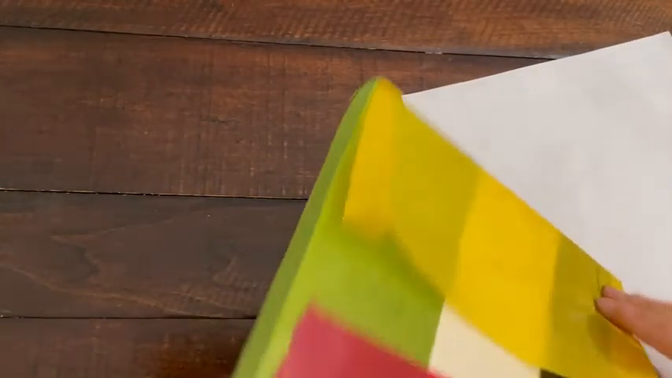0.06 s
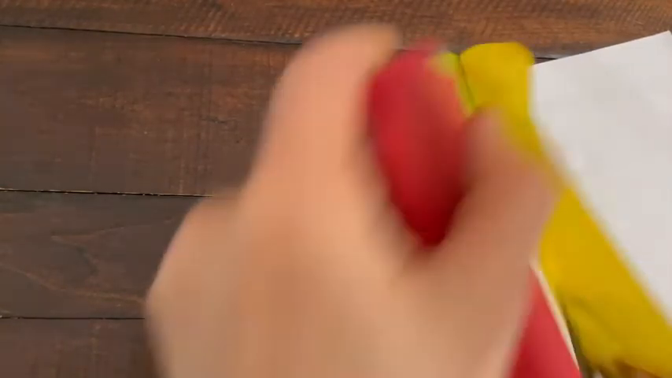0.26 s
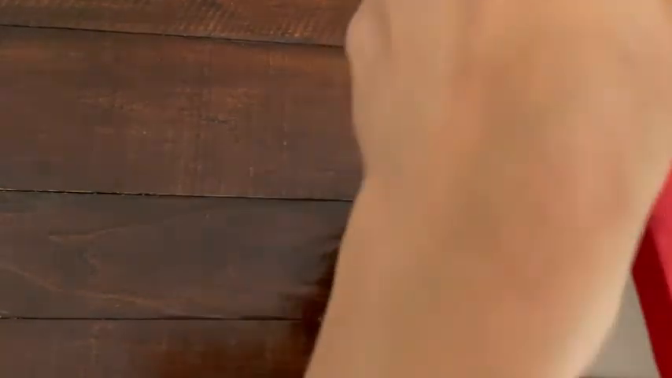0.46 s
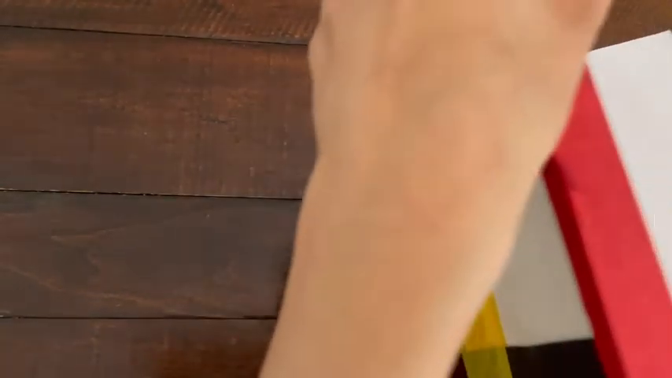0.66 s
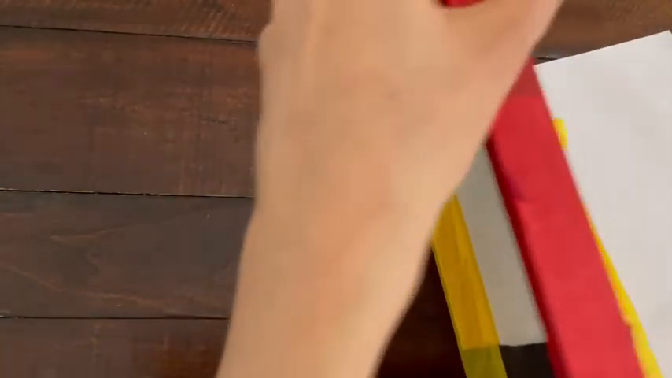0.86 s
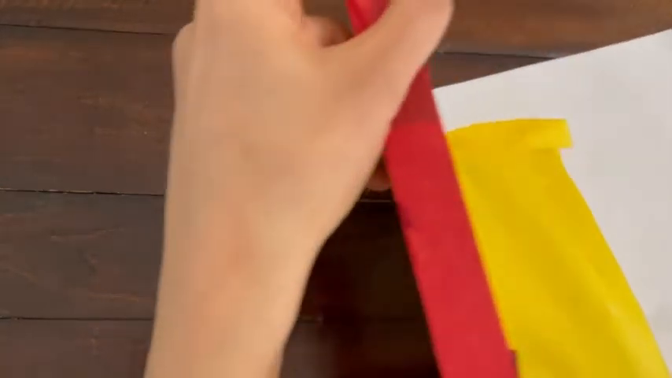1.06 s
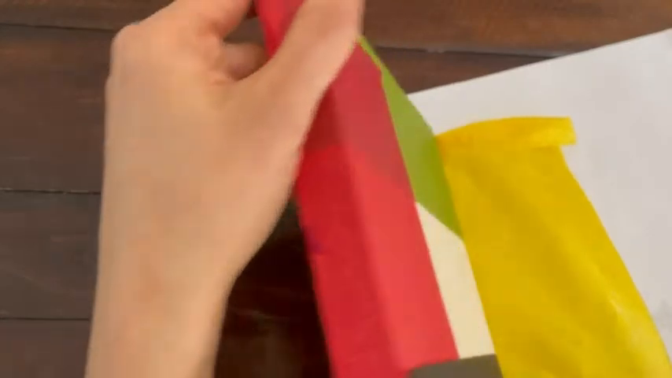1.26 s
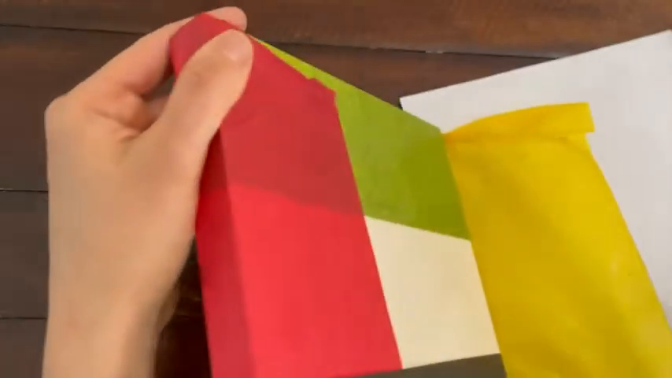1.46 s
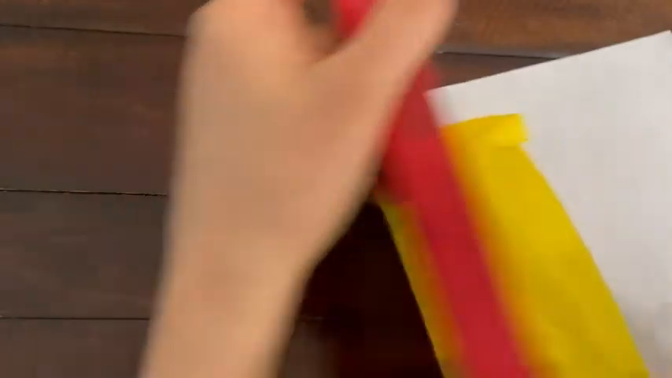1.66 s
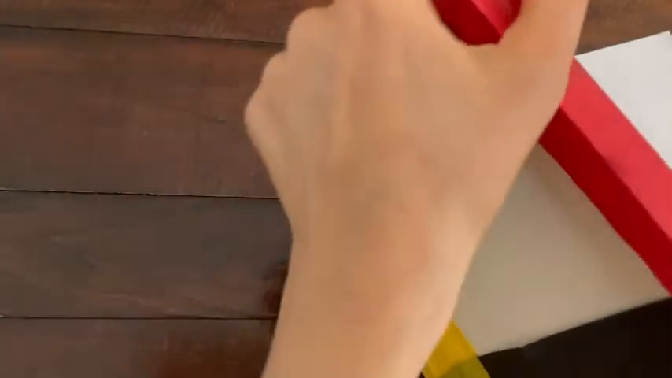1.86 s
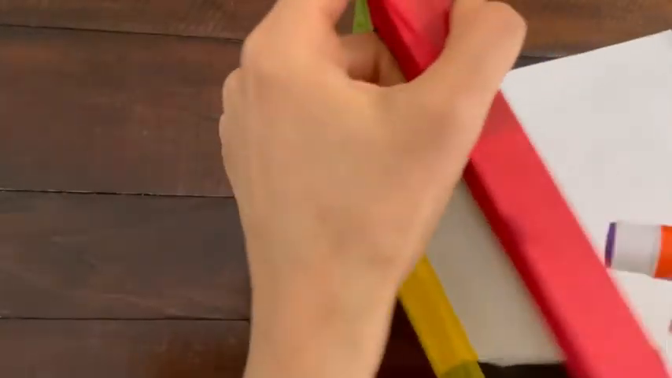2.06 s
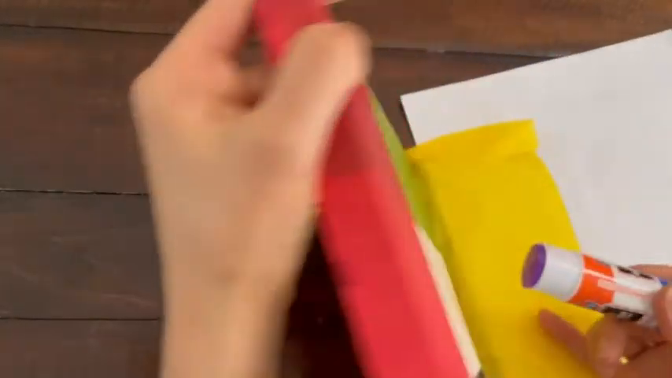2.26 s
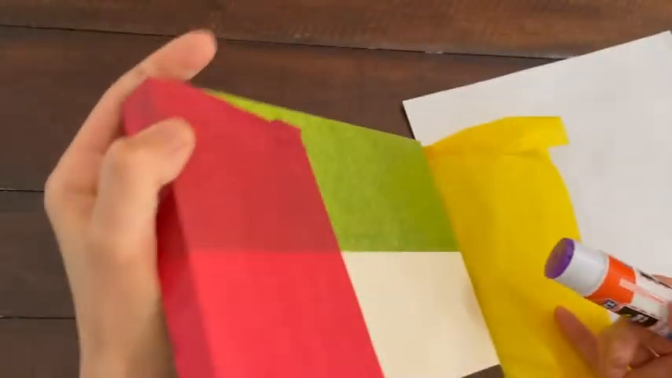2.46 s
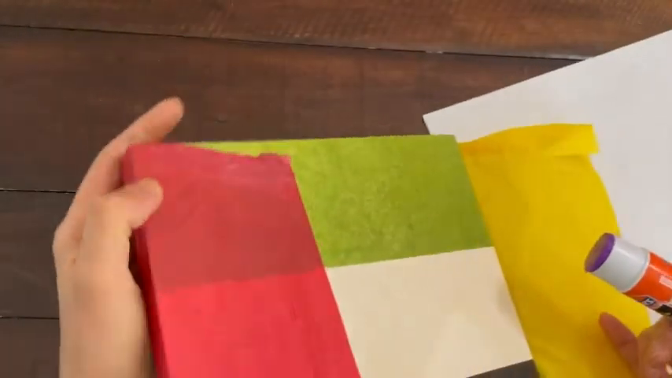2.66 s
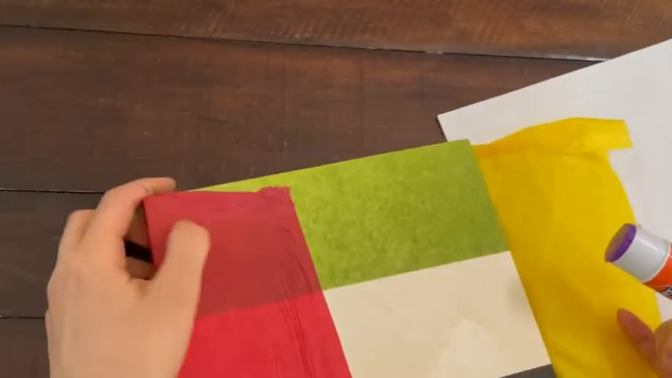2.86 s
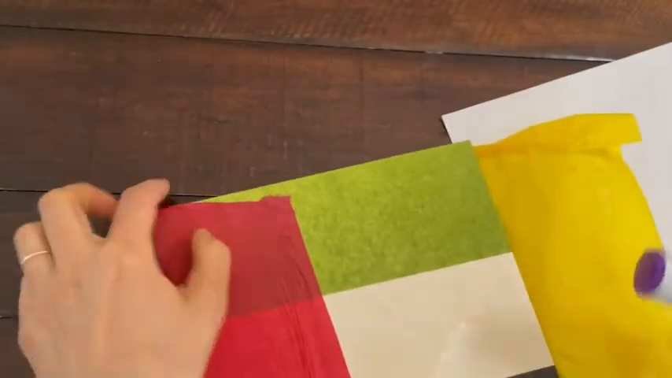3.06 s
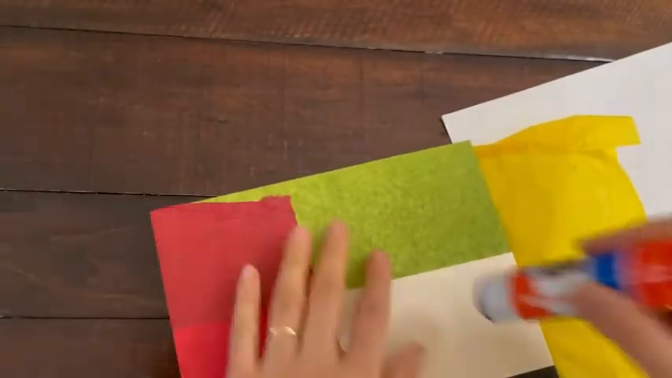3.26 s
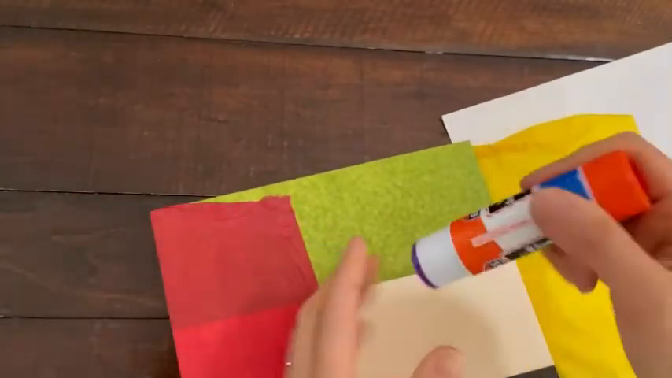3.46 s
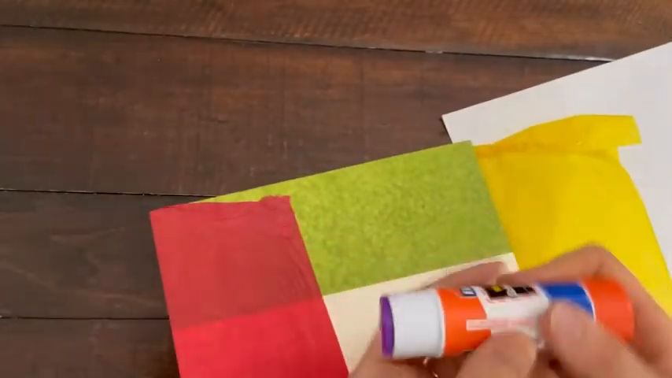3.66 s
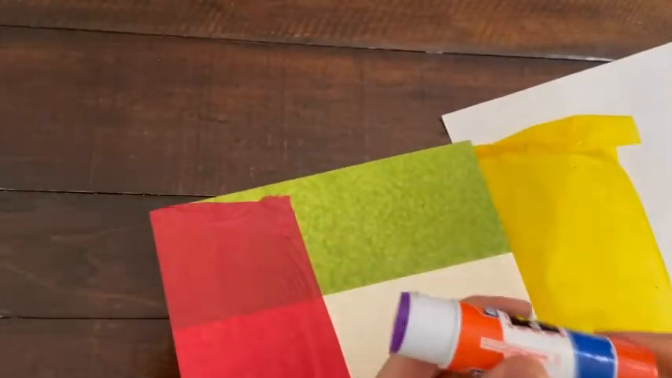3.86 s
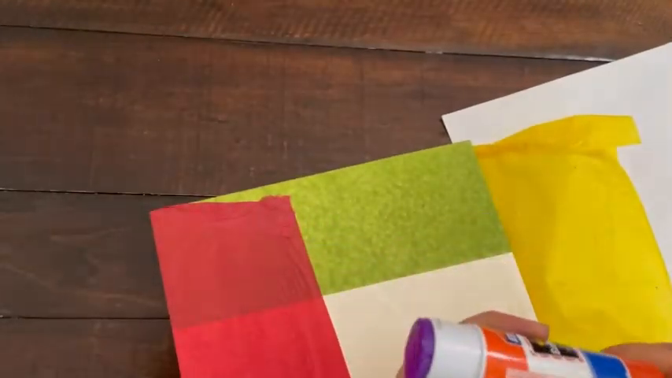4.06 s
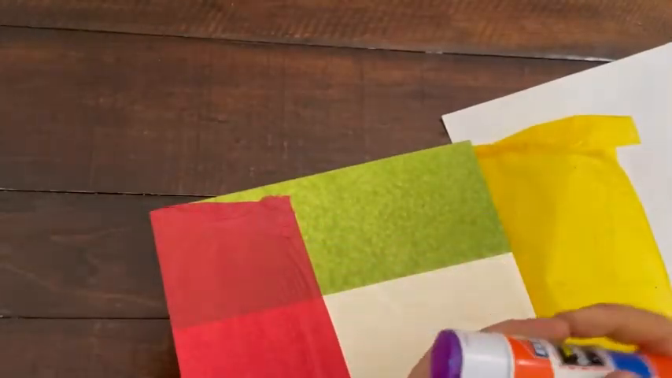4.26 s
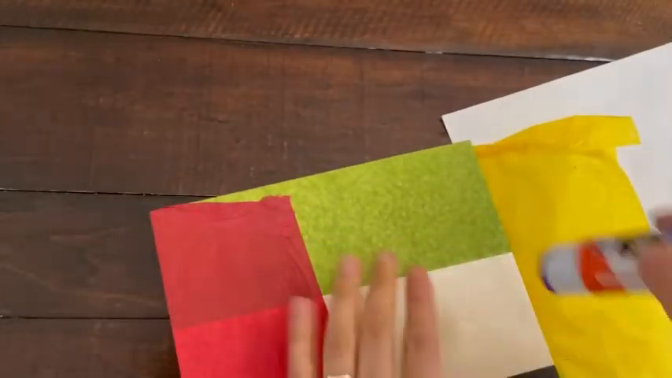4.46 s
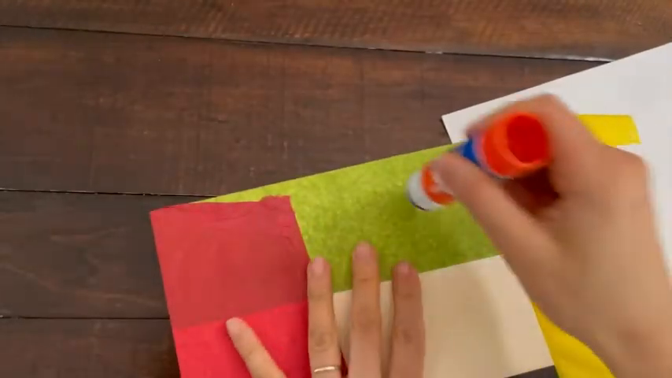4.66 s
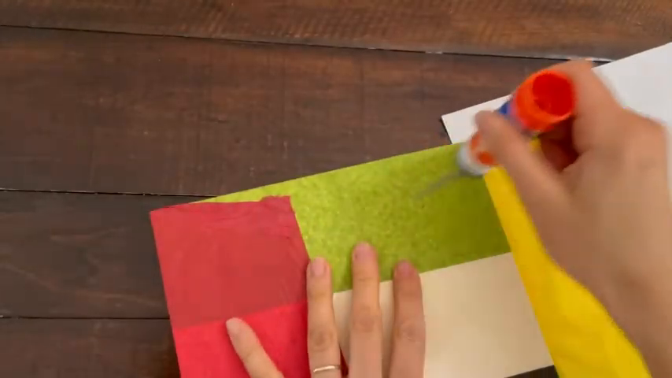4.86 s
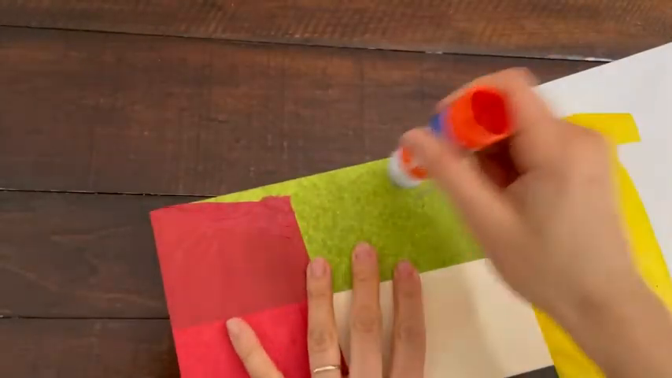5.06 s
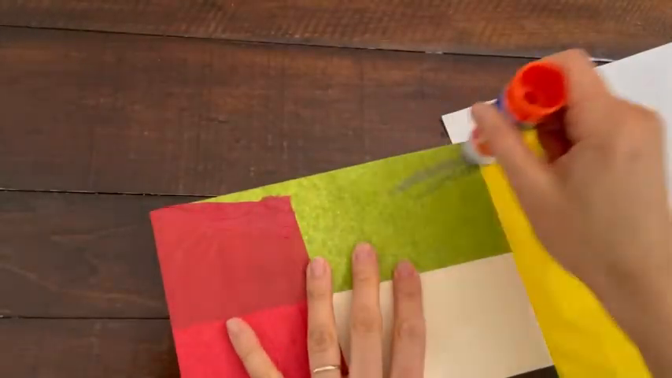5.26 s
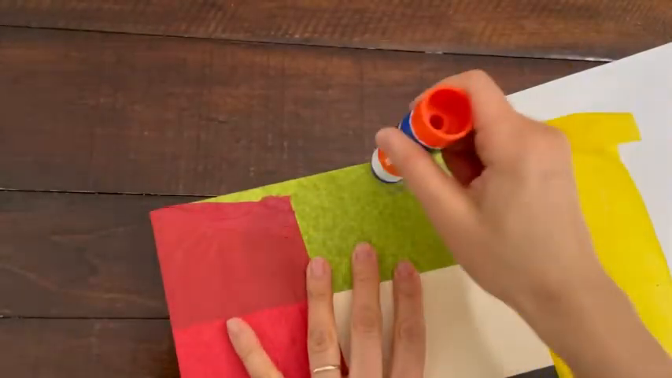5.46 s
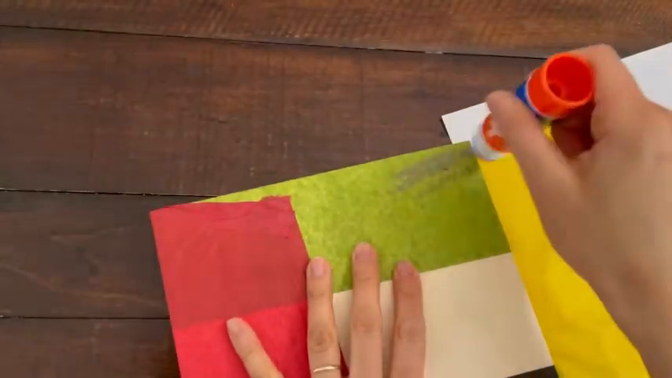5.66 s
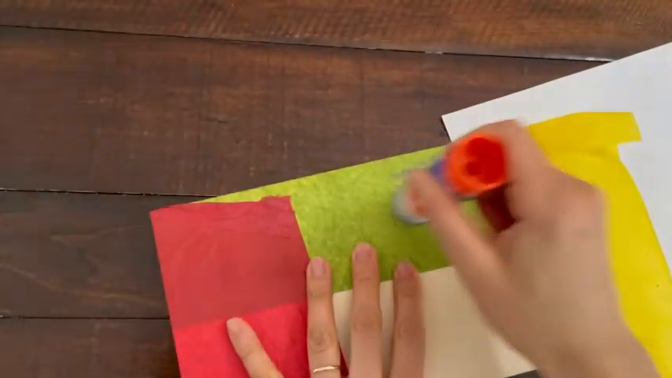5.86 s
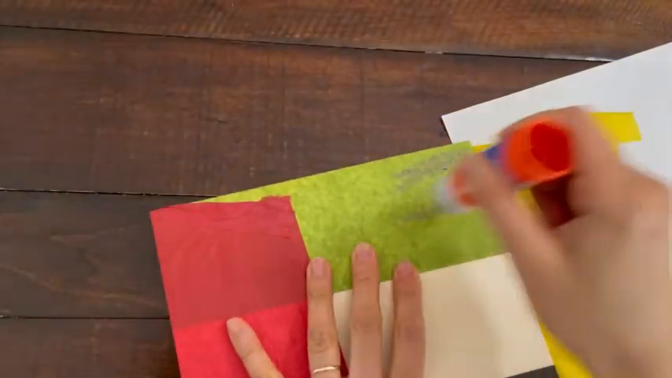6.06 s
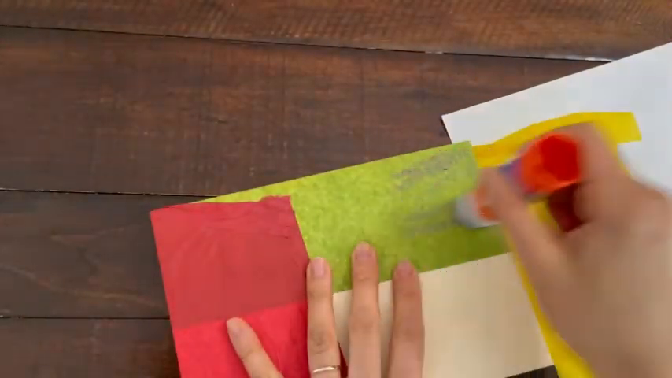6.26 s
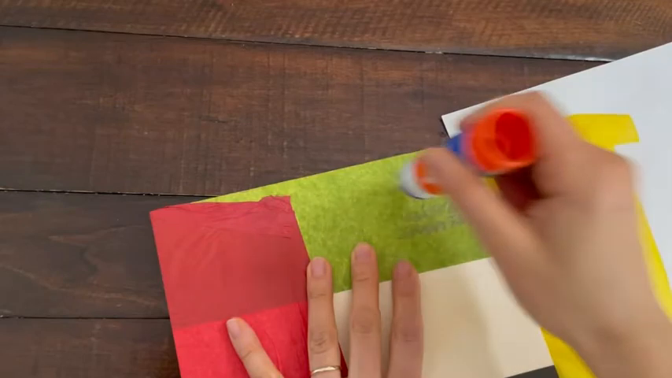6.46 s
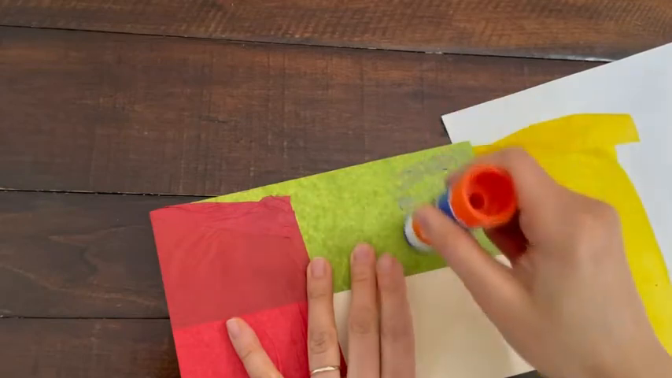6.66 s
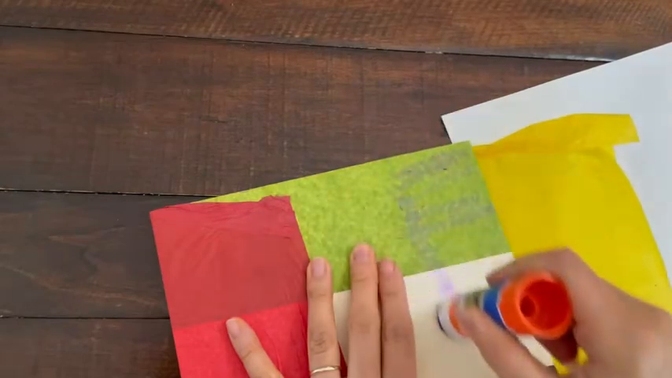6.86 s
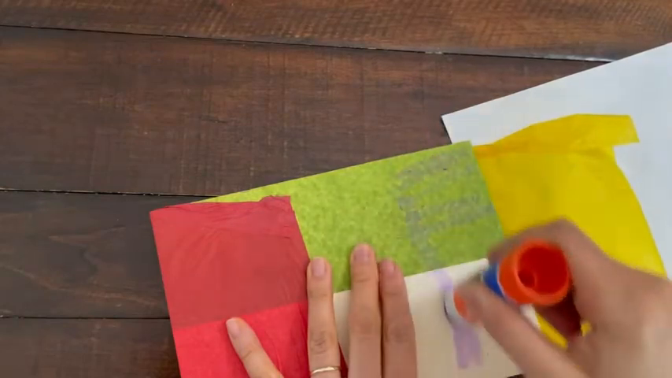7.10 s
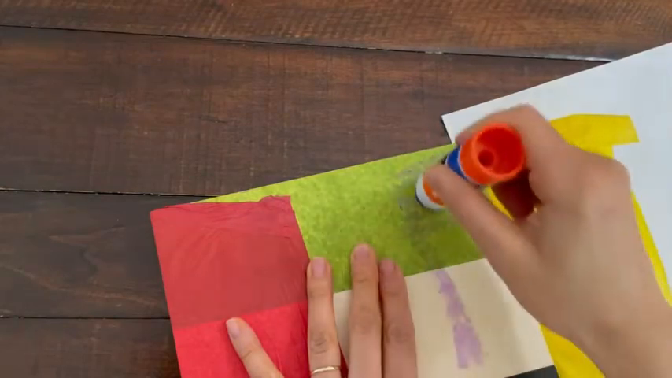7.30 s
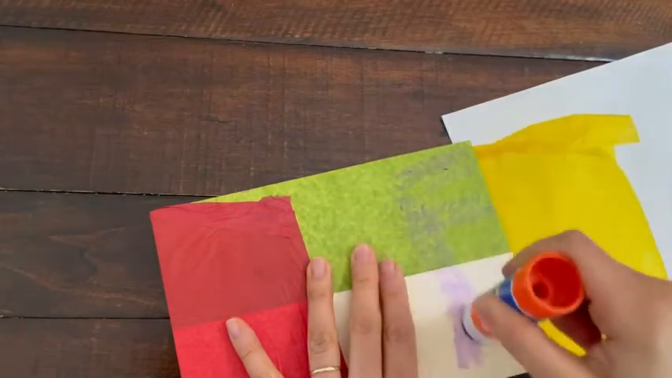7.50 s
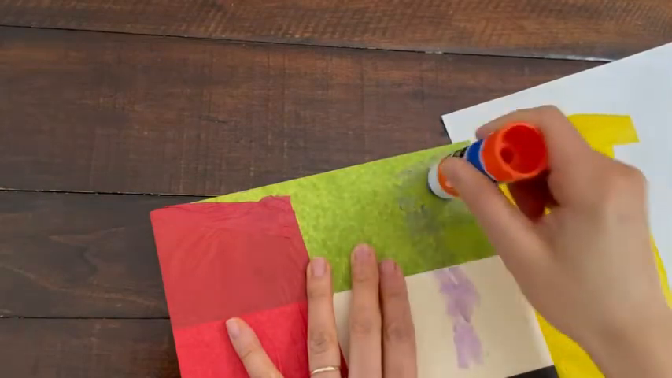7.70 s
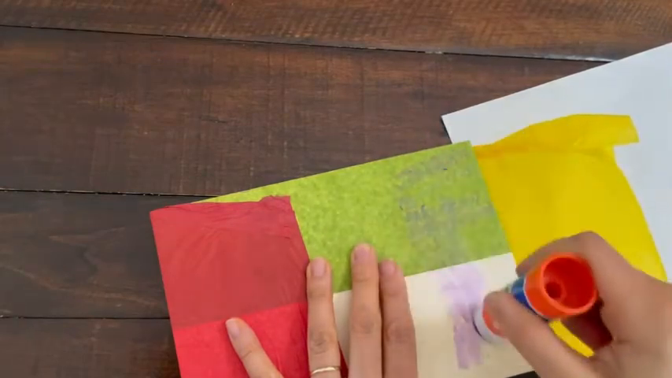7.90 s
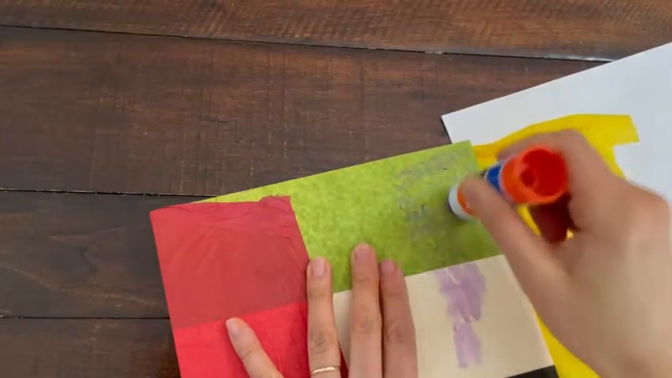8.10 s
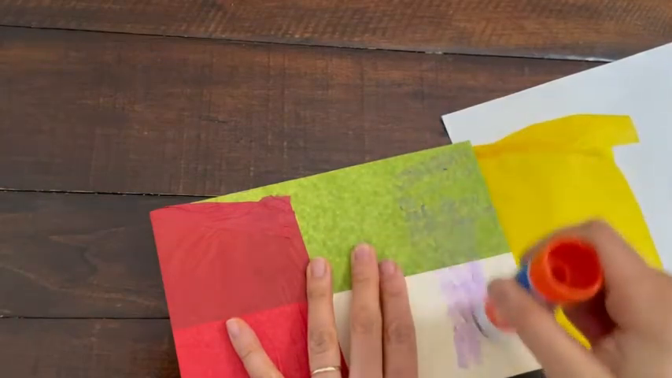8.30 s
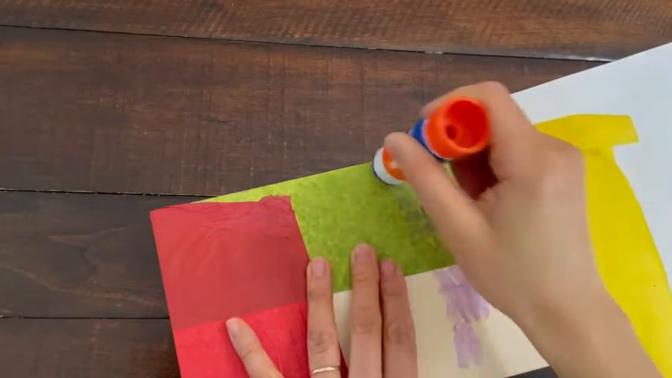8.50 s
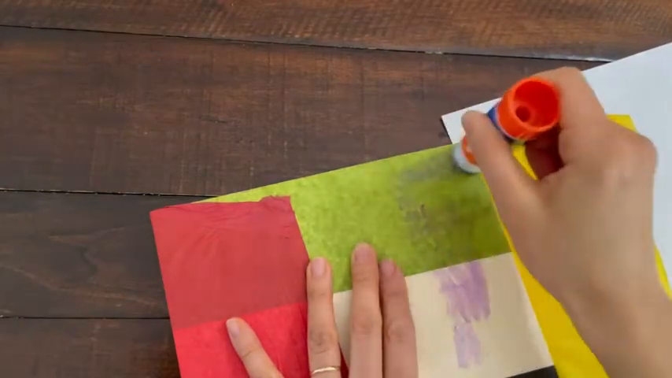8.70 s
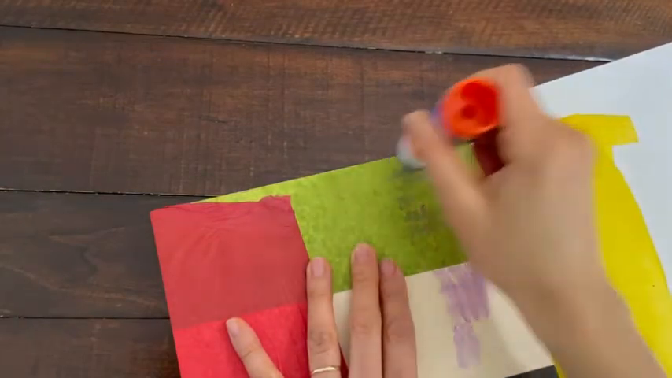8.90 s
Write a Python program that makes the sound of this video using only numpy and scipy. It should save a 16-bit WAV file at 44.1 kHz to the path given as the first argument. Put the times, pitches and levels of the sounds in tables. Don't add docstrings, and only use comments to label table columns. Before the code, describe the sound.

Tissue paper rustles and crackles as a board is turned, slaps loudly flat on wood, then a glue stick taps and rubs in short strokes.

```python
import sys
import numpy as np
from scipy import signal
from scipy.fft import rfft, irfft, next_fast_len
from scipy.io import wavfile
from scipy.ndimage import uniform_filter1d, map_coordinates

SR = 44100
rng = np.random.default_rng(int(sys.argv[2]) if len(sys.argv) > 2 else 0)


def elevation(decibels):
    levels = np.asarray(decibels, float)
    return 10 ** (levels / 20)


def dump_mix(stems):
    frames = np.atleast_2d(stems).T
    limited = np.clip(frames, -1, 1)
    pcm = np.round(limited * 32767).astype(np.int16)
    wavfile.write(sys.argv[1], SR, pcm)


N = 394254

# (frequency [Hz], density [dB per Hz])
HISS = [(150, -30.5), (250, -1), (336, -11), (560, -13.5), (800, -23.5), (1200, -29.5), (2860, -30),
        (7500, -33.5), (13500, -37), (15000, -44.5), (16400, -90.5)]
# (frequency [Hz], level [dB])
WHINE = [(2896, -106)]
HISS_DB = -72.5

# (time [s], sliding [dB], pressure [dB])
HAND_MOVES = [
    [(0.0, -55, -49), (0.03, -63, -52), (0.17, -67, -54), (0.26, -65, -64), (0.33, -70, -61),
     (0.404, -76, -68), (0.412, -62, -63), (0.466, -62, -63), (0.48, -68, -68), (0.512, -68, -71),
     (0.654, -77, -88), (0.78, -82, -92), (0.83, -92, -98), (1.0, -95, -100)],
    [(1.23, -86, -85), (1.3, -75, -77), (1.386, -69, -74), (1.41, -86, -78), (1.47, -69, -66),
     (1.6, -66, -65), (1.68, -64, -69), (1.745, -60, -58), (1.757, -67, -70), (1.826, -65.5, -70),
     (1.836, -84, -78), (1.888, -86, -78), (1.9, -68, -67), (1.96, -62.5, -72), (2.02, -65, -64),
     (2.124, -70.5, -66), (2.166, -60.5, -66), (2.252, -67, -65), (2.548, -57, -53), (2.63, -61, -59),
     (2.73, -66, -63), (2.822, -71, -67), (2.89, -62, -52)],
]
# (time [s], rustle [dB],
# fade by 20 dB [s], brightness [dB], edge scrape [dB])
BRUSHES = [(0.09, -72, .2, -30, -10), (0.445, -66, .05, -10, 9), (0.604, -54, .035, -8, -40),
           (0.746, -82, .06, -2, -6), (1.062, -55, .15, -24, -8), (1.024, -72, .02, -12, 0),
           (1.2, -68, .008, 10, -40), (1.222, -84, .07, 10, -20), (2.596, -66, .04, -4, 15),
           (2.75, -74, .06, -16, 10), (2.85, -69, .03, -8, 13), (2.99, -90, .1, 15, -30),
           (3.44, -84, .12, 8, -30), (3.6, -78, .2, 6, -30), (3.66, -83, .12, 6, -20),
           (4.124, -61, .05, 5, -10), (4.202, -75, .15, 5, -8), (4.502, -69, .05, -3, 10),
           (4.545, -70, .12, -8, 5), (4.585, -73, .02, -8, 5),
           (5.512, -84, .06, 13, -30), (5.788, -76, .05, 11, -30), (6.128, -75, .05, 21, 5),
          (6.241, -55, .03, -7, -3), (6.265, -61, .06, -7, -6), (6.324, -72, .07, -8, 0),
          (6.51, -86, .1, -8, 10), (6.54, -86, .06, -8, 10), (6.625, -78, .2, -4, 8),
          (6.675, -82, .02, -4, 10), (6.72, -94, .5, -34, 9), (6.875, -88, .03, -4, 12),
          (6.897, -83, .02, -4, 2), (6.96, -89, .15, 12, 8), (7.02, -92, .03, -10, 16),
          (7.28, -84, .08, -8, 12), (7.318, -78, .05, -8, 12), (7.345, -78, .1, -8, 4),
          (7.718, -77, .1, -6, 8), (8.09, -84, .1, -2, 8), (8.475, -74, .02, -6, -20),
          (8.874, -88, .05, 8, -20)]
# (time [s], level [dB], length [s])
STROKES = [(4.687, -81, .13), (5.049, -74, .14), (5.405, -78, .12), (5.758, -71, .14), (6.105, -72, .12),
           (6.481, -87, .1), (7.27, -80, .17), (7.642, -75, .2), (8.046, -74, .13), (8.46, -88, .17),
           (8.762, -86, .12)]
# (frequency [Hz], density [dB per Hz])
TISSUE = [(700, -34), (1200, -5), (2300, -1), (3300, -0.5), (4700, -4), (5500, -1), (7700, -2), (10000, -7),
          (11500, -32)]
# (frequency [Hz], density [dB per Hz])
SHEEN = [(8000, -39.5), (10000, -7), (12000, -3.5), (14000, 2), (15600, -5), (15900, -30), (16300, -120)]
# (frequency [Hz], density [dB per Hz])
BODY = [(88, -41.5), (150, -13), (215, -11.5), (251, 0), (490, -7.5), (536, -3.5), (637, -9), (800, -14.5),
        (1030, -13), (1300, -17), (1690, -44), (2860, -120)]
# (frequency [Hz], density [dB per Hz])
RUMBLE = [(12, -45.5), (20, -19.5), (32, -6.5), (43, -2.5), (64, 1.5), (92, -5), (150, -8), (220, -14.5),
          (290, -48), (480, -120)]
# (frequency [Hz], likeness [0-1])
ALIKE = [(60, 1), (150, 0.95), (300, 0.64), (640, 0.56), (1400, 1), (3100, .85), (6500, 0.5), (9300, 1),
         (11800, 1), (15000, 0.75)]
# (frequency [Hz], width [Hz], level [dB])
EDGE_LIFTING = [(301, 150, 0), (1160, 160, -15), (1630, 110, -6), (2020, 45, -14), (2620, 64, -12),
                (3530, 26, -24), (3840, 110, -24), (4420, 50, -17), (4670, 59, -21)]
# (frequency [Hz], width [Hz], level [dB])
EDGE_STANDING = [(565, 61, -5), (1240, 37, -3), (1590, 47, 0), (2270, 93, 0), (2640, 49, -2),
                 (3340, 77, -7), (4240, 170, -8)]
# (frequency [Hz], width [Hz], level [dB])
EDGE_LOWERING = [(544, 25, -3), (1010, 37, -3), (1180, 51, -5), (1780, 30, -8), (2260, 53, 0),
                 (2620, 43, -3), (2960, 27, -12), (4240, 78, -14)]
# (frequency [Hz], width [Hz], level [dB])
EDGE_FLAT = [(600, 200, -6), (1050, 200, -4), (1550, 380, 0), (2200, 260, 0), (2900, 200, -7),
             (3700, 500, -6)]
LIFTED_S, LOWERED_S, TURN_S = .26, 2.33, .03
DULL_SHARE, NEUTRAL_DB = .3, -70
LEAN_S = .08
FIRM_DB, BODY_GROWS = -54, 1.6
REST_BODY_DB, REST_RUMBLE_DB, RUMBLE_SHARE = -85, -68, .3
BRUSH_RISE_S = .022
SETTLE_DB, SETTLE_S = -50, .3
DRAG_SHEEN_DB, SHEEN_SAG, DRAG_BODY_DB, BODY_SAG = -8, .3, 5, .4
GRIP_S, SAG_DB, LIFT_DB_PER_S = .025, 12, 450

# (time [s], peak [dB], hardness [dB], low knock [dB], table thud [dB])
TOUCHES = [
    (0.1, -46, -20, -2, -46),
    (0.602, -67.5, -5, 0, -48.5),
    (1.031, -46, 5, 1, -69),
    (1.046, -43, 0, -1, -61),
    (4.493, -45, -4, -14, -62),
    (6.239, -48, 5, -6, -53),
    (7.031, -60, -25, -20, -72),
]
# (time [s], peak [dB], crack [dB], hardness [dB], low knock [dB])
TAPS = [(4.687, -32, -12, -7, -11.5), (5.049, -23.5, -14, -13, -4), (5.405, -19.5, -22.5, -20, -9),
        (5.758, -21, -1.5, -5.5, -3), (6.105, -21, -7.5, -8, -12), (6.48, -42, -28, -28, 6),
        (7.248, -37, -28, -17, -8), (7.642, -32, -16, -28, -1), (8.046, -28, -18, -17, -6),
        (8.46, -30, -23, -25, -4), (8.762, -29.5, -17, -19, -3.5)]
ARM_DB = -43
# (frequency [Hz], level [dB], t60 [s])
STICK = [(1792, -3, 0.017), (2040, 1, 0.0076), (2270, -4, 0.017), (2943, -3.5, 0.013), (3110, -12, 0.0093)]
# (frequency [Hz], level [dB], t60 [s])
PAD = [(403.7, 2, 0.041), (464.8, -4.5, 0.062), (545.6, -1, 0.04045), (696, -9, 0.021)]
# (frequency [Hz], level [dB], t60 [s])
PAD_LOW = [(225.6, -1, 0.15), (288.5, 3, 0.046)]
# (frequency [Hz], level [dB], t60 [s])
PAD_HIGH = [(810, -6, 0.0081), (1010, 14.5, 0.005), (1345, -12, 0.015), (1470, -6, 0.0094)]
# (frequency [Hz], level [dB], t60 [s])
TABLE = [(43.92, -5, 0.41), (72, -5.5, .3), (110.5, -1.5, 0.2), (125.4, -0.5, 0.22), (165, -7, 0.12)]
LOWS_LATE = .7
# (time [s], peak [dB], pitch [Hz], t60 [s])
POPS = [(0.1022, -32, 420, .014), (2.8953, -8, 740, .013), (4.5015, -45, 600, .03), (4.508, -48, 640, .03),
        (4.687, -43, 1400, .008), (5.049, -35, 800, .01), (5.0495, -41, 2000, .015), (5.05, -44, 3000, .02),
        (5.405, -37, 970, .01), (5.758, -26, 1950, .009), (6.1043, -31, 2100, .008),
        (6.107, -27, 540, .025), (6.68, -64, 480, .06), (7.033, -56, 480, .03), (7.248, -43, 1330, .01),
        (7.642, -48, 1500, .01), (8.047, -43, 790, .01), (8.4605, -37, 780, .012), (8.762, -33, 900, .012)]

# (time [s], peak [dB], pitch [Hz])
FIBRE_TICKS = [(0.3277, -50, 2010), (0.3584, -52, 2040), (0.4099, -46, 2130), (0.4309, -41, 2310),
               (0.4694, -51, 2850), (0.6019, -41, 5260), (0.7966, -67, 2480), (0.822, -64, 5580),
               (0.8864, -68, 3760), (0.9038, -63, 5820), (1.1564, -53, 5430), (1.2984, -57, 2270),
               (1.3754, -55, 2740), (1.5494, -48, 5200), (1.6506, -46, 2560), (1.7194, -45, 2350),
               (1.7444, -45, 2260), (1.7918, -49, 3890), (1.8044, -48, 6910), (1.9155, -50, 2850),
               (2.0183, -47, 2270), (2.0991, -48, 1890), (2.1409, -39, 5670), (2.2344, -48, 2620),
               (2.3002, -42, 2340), (2.4414, -43, 2620), (2.4703, -38, 2580), (2.5187, -38, 2230),
               (2.553, -37, 2280), (2.6844, -48, 4300), (2.8469, -47, 1900)]
# (time [s], peak [dB], pitch [Hz])
PINGS = [
    (0.9562, -50, 13800),
    (1.0321, -44, 13500),
    (1.0465, -36, 13500),
    (1.1982, -40, 13500),
    (4.122, -52, 13500),
    (6.2386, -46, 13500),
]
# (time [s], peak [dB], pitch [Hz])
GLUE_TICKS = [(4.4964, -44, 1950), (4.5394, -52, 3390), (4.5794, -55, 1880), (6.2324, -31, 1310),
              (6.2454, -42, 1250), (6.2714, -44, 1590), (6.3264, -54, 1410), (6.3844, -60, 1240),
              (6.5394, -62, 1330), (6.6794, -63, 2170), (6.8744, -64, 1500), (6.8954, -68, 1200),
              (7.3244, -58, 2160)]
TICK_CYCLES, TICK_LEAST_S = 16, .004
# (time [s], peak [dB], left over right [dB])
SNAPS = [(0.412, -46, -8), (0.903, -68, -5), (0.9575, -60, 4), (1.0334, -34, -3), (1.0472, -25, -0.5),
         (1.1993, -37, 0.5), (1.8264, -48.5, 1), (2.1572, -41.5, 5.5), (2.213, -46.5, 1.5),
         (2.2997, -46, -1), (2.3568, -46, -1.5), (2.6907, -52, -3), (3.6016, -63, 6), (4.2052, -55.5, 7.5),
         (5.5083, -77, -1.0), (5.784, -49, 6), (6.2386, -39, 8.5), (6.4014, -80.5, -12), (8.8771, -64, 6.5)]
# (frequency [Hz], level [dB])
CRISP = [(800, -27.5), (2000, -5.5), (4000, -4), (8000, 0.5), (14000, -10), (16000, -15.5), (16600, -90)]
# (time [s], level [dB], rise by 20 dB [s], fall by 20 dB [s])
GROANS = [
    (1.13, -62, .04, .1),
    (1.732, -65.5, .25, .3),
    (1.775, -61, .03, .12),
    (1.9, -57, .012, .16),
    (2.68, -57, .25, .15),
    (2.81, -68, .05, .03),
]

# (time [s], peak [dB])
KNOCK = [
    (2.894, -3.5),
]
# (frequency [Hz], level [dB], t60 [s])
BOARD = [(231, -2, 0.055), (290, -2, .04), (345, -3, 0.022), (430, -4, 0.022), (503, 1.5, 0.059),
         (622, 1, 0.047), (790, 0, 0.028), (1013, -4.5, 0.08), (1178, -1.5, .07), (1610, -24, 0.06),
         (1780, -18, 0.045), (2000, -20, .02), (2750, -25, 0.012), (3600, -33, 0.016)]
# (frequency [Hz], level [dB])
ECHO = [(60, -1.5), (300, 2.5), (800, 1), (1000, -1.5), (1250, 0), (1500, 2), (3500, -2), (8000, -3)]
# (frequency [Hz], t60 [s])
ROOM = [(100, .5), (500, .56), (1200, .48), (2000, .5), (3500, .36), (8000, 0.32)]
# (frequency [Hz], phase [rad])
PORT_LAG = [(120, 0), (300, .35), (600, .5), (1200, .4), (4300, .55), (7000, 1.2), (8500, 2.8),
            (11300, 3.5), (12300, 4.8), (13500, 5.8), (16000, 6.4)]
# (frequency [Hz], level [dB])
PORT_TILT = [(70, .2), (140, 1.8), (300, 2.2), (600, .4), (1100, -3.5), (2000, -2.2), (6000, 0)]


def unit(x):
    return x / np.sqrt(np.mean(x ** 2) + 1e-20)


def along(points, hz):
    f, v = np.transpose(points)
    return np.interp(np.log(hz + 1), np.log(f + 1), v)


def filtered(x, response):
    m = next_fast_len(N + SR // 4)
    return irfft(rfft(x, m) * response(np.fft.rfftfreq(m, 1 / SR)), m)[..., :N]


def coloured(x, colour):
    return filtered(x, lambda hz: elevation(along(colour, hz)))


def wobble(rate):
    knots = rng.standard_normal(int(N * rate / SR) + 4)
    return map_coordinates(knots, [np.arange(N) * rate / SR])


def add(out, s, x, pan_db):
    at = round(s * SR)
    out[:, at:at + len(x)] += x * elevation([[pan_db / 2], [-pan_db / 2]])


def rush(spectrum, patchy_db, grit_db):
    gritty = rng.standard_normal((2, N)) * elevation(grit_db * wobble(700))
    z = signal.stft(gritty, nperseg=512)[2]
    field = uniform_filter1d(rng.standard_normal(z.shape[1:]), size=5, axis=0)
    field = uniform_filter1d(field, size=10, axis=1)
    pair = signal.istft(z * elevation(patchy_db * unit(field)), nperseg=512)[1][:, :N]

    def mid_side(hz):
        turn = np.arccos(np.clip(along(ALIKE, hz), -1, 1)) / 2
        return elevation(along(spectrum, hz)) * [np.cos(turn), np.sin(turn)]

    mid, side = filtered(pair, mid_side)
    return unit(np.array([mid + side, mid - side]))


def quiet():
    t = np.arange(N) / SR
    whine = sum(elevation(db + 5.5 + 2.5 * wobble(6)) * np.sin(2 * np.pi * hz * t) for hz, db in WHINE)
    return elevation(HISS_DB - 6) * rush(HISS, patchy_db=0.6, grit_db=1.3) + whine


def movements(tables):
    rows = []
    for table in tables:
        silent = [-115] * (len(table[0]) - 1)
        rows += [(table[0][0] - .012, *silent), *table, (table[-1][0] + .006, *silent)]
    s, *columns = np.transpose(rows)
    return [np.interp(np.arange(N) / SR, s, column) for column in columns]


def swells(s, db, rise, fall):
    s, db, rise, fall = [np.reshape(column, (-1, 1)) for column in (s, db, rise, fall)]
    t = np.arange(0, N, 88) / SR
    late = t - s
    drop = np.maximum(late / fall, -late / rise)
    return np.interp(np.arange(N) / SR, t, elevation(db - 20 * drop).sum(axis=0))


def strokes(offset_db, sag):
    t = np.arange(0, N, 88) / SR
    s, db, length = np.transpose(STROKES)[:, :, None]
    late = t - s
    db = db + offset_db - sag * SAG_DB * late / length
    db = db - LIFT_DB_PER_S * np.maximum(late - length, 0)
    grip = np.clip(late / GRIP_S, 0, 1) ** 2
    return np.interp(np.arange(N) / SR, t, (elevation(np.minimum(db, 0)) * grip).sum(axis=0))


def crackle(rate, spread_db):
    sizes = elevation(spread_db * np.minimum(rng.exponential(size=N), 3))
    spikes = (rng.random(N) < rate / SR) * sizes
    burst = elevation(-60 * np.arange(130) / SR / .003) * rng.standard_normal(130)
    return unit(coloured(np.convolve(spikes, burst)[:N] * rng.choice([-1, 1], N), CRISP))


def sung(noise, peaks, rough):
    def response(f):
        total = rough * f * f / (f * f + 1500 ** 2)
        for k, (centre, width, db) in enumerate(peaks):
            damping = 1j * f * width
            total = total + (-1) ** k * elevation(db) * damping / (centre * centre - f * f + damping)
        return total

    return unit(filtered(noise, response))


def scraped(noise):
    t = np.arange(N) / SR
    lifted, lowered, flat = [np.clip((t - s) / TURN_S, 0, 1) for s in (LIFTED_S, LOWERED_S, KNOCK[0][0])]
    song = (1 - lifted) * elevation(6) * sung(noise, EDGE_LIFTING, rough=.06)
    song += (lifted - lowered) * elevation(4) * sung(noise, EDGE_STANDING, rough=.12)
    song += (lowered - flat) * elevation(1.5) * sung(noise, EDGE_LOWERING, rough=.2)
    return song + flat * elevation(1.5) * sung(noise, EDGE_FLAT, rough=.1)


def paper():
    slide_db, press_db = movements(HAND_MOVES)
    s, db, fade, bright_db, edge_db = np.transpose(BRUSHES)

    slide = elevation(slide_db) + swells(s, db, BRUSH_RISE_S, fade) + strokes(0, sag=1)
    top = elevation(slide_db - DULL_SHARE * np.maximum(slide_db - NEUTRAL_DB, -30))
    top += swells(s, db + bright_db, BRUSH_RISE_S, fade) + strokes(DRAG_SHEEN_DB, SHEEN_SAG)
    scrape = elevation(press_db) + swells(s, db + edge_db, BRUSH_RISE_S, fade)

    push = elevation(FIRM_DB + 2.5 + BODY_GROWS * (press_db - FIRM_DB))
    lean = np.abs(uniform_filter1d(push, size=int(LEAN_S * SR))) + elevation(REST_BODY_DB)
    lean += swells(KNOCK[0][0], SETTLE_DB, BRUSH_RISE_S, SETTLE_S)
    lean += strokes(DRAG_BODY_DB, BODY_SAG)
    lean += swells(s, db - bright_db - 14, BRUSH_RISE_S, fade)

    catch = wobble(30) + 0.54 * wobble(60)
    rustle = slide * elevation(2.0 + 3.2 * catch) * rush(TISSUE, patchy_db=2.0, grit_db=1.5)
    rustle += slide * elevation(-2.5) * crackle(rate=400, spread_db=3.5)
    sheen = top * elevation(0.6 + 3.1 * catch) * rush(SHEEN, patchy_db=2.8, grit_db=1.5)
    rub = rush([(150, -40), (260, 0), (3000, -0.5), (4700, -1.5), (6000, -40)], patchy_db=3, grit_db=3.0)
    edge = scrape * elevation(-1.8 + 1.5 * catch) * scraped(rub)
    body = lean * elevation(0.97 * catch) * rush(BODY, patchy_db=3.5, grit_db=2.5)
    shake = (lean / elevation(REST_BODY_DB)) ** RUMBLE_SHARE * elevation(REST_RUMBLE_DB + 1.4 * wobble(18))
    return rustle + sheen + edge + body + shake * rush(RUMBLE, patchy_db=2.5, grit_db=1.15)


def ring(modes, attack, scatter_db, blur):
    hz, db, t60 = np.transpose(modes)[:, :, None]
    t = np.arange(SR // 2) / SR
    t = t[t < 2 * t60.max()]
    steps = uniform_filter1d(rng.standard_normal((len(modes), len(t))), size=60, axis=1)
    drift = blur * np.cumsum(steps, axis=1) / np.sqrt(SR)
    level = db + scatter_db * rng.standard_normal(hz.shape) - 60 * t / t60
    onset = 1 - np.exp(-(t / attack * (hz / hz.max()) ** LOWS_LATE) ** 2)
    x = (elevation(level) * onset * np.sin(2 * np.pi * hz * t + drift)).sum(axis=0)
    return np.pad(x, (0, SR // 2 - len(t))) / np.abs(x).max()


def slap(top_hz, t60):
    t = np.arange(SR // 20) / SR
    burst = elevation(-60 * t / t60) * rng.standard_normal(len(t))
    x = signal.lfilter(*signal.butter(2, top_hz, fs=SR), burst)
    return x / np.abs(x).max()


def taps():
    out = np.zeros((2, N + SR))
    touches = [(s, db, hard_db, hard_db, low_db, thud_db) for s, db, hard_db, low_db, thud_db in TOUCHES]
    landings = [(*row, ARM_DB) for row in TAPS]
    for s, db, crack_db, hard_db, low_db, thud_db in touches + landings:
        click = elevation(db + crack_db + 3) * ring(STICK, attack=.0003, scatter_db=1.5, blur=60)
        click += elevation(db + hard_db + 7) * ring(PAD_HIGH, attack=0.0014, scatter_db=4.5, blur=24.9)
        thump = elevation(db + 1.5) * ring(PAD, attack=0.0011, scatter_db=3.5, blur=20.3)
        bend = elevation(db + low_db + 1.5) * ring(PAD_LOW, attack=0.0037, scatter_db=3.0, blur=18)
        thud = elevation(thud_db + 8) * ring(TABLE, attack=0.016, scatter_db=4.5, blur=9)
        add(out, s - .008, elevation(-31) * click + elevation(-30) * thump, 0)
        add(out, s, click + thump, 0)
        add(out, s, elevation(db + crack_db - 3.5) * slap(top_hz=4500, t60=0.0071), 0)
        add(out, s + 0.0016, thud, 0)
        add(out, s + .002, bend, 0)
    return out[:, :N]


def pops():
    out, t = np.zeros((2, N + SR)), np.arange(SR // 20) / SR
    for s, db, hz, t60 in POPS:
        onset = 1 - np.exp(-t * hz / .4)
        add(out, s, -elevation(db + 5 - 60 * t / t60) * np.sin(2 * np.pi * hz * t) * onset, 0)
    return out[:, :N]


def ticks():
    out, t = np.zeros((2, N + SR)), np.arange(300) / SR
    for s, db, hz in FIBRE_TICKS + PINGS + GLUE_TICKS:
        wander = 1.2 * np.cumsum(rng.standard_normal(len(t))) * np.sqrt(hz / SR)
        t60 = max(TICK_CYCLES / hz, TICK_LEAST_S)
        add(out, s, elevation(db + 0.1 - 60 * t / t60) * np.sin(2 * np.pi * hz * t + wander), 0)
    return out[:, :N]


def snaps():
    out, t = np.zeros((2, N + SR)), np.arange(2000) / SR
    for s, db, pan_db in SNAPS:
        shape = elevation(-60 * t / 0.0041) + 0.23 * elevation(-60 * t / .05)
        add(out, s, elevation(db + 6) * shape * rng.standard_normal(len(t)), pan_db)
    return coloured(out[:, :N], CRISP)


def groan():
    lowest = [(200, -40), (238, -4), (252, 0), (266, -4.5), (320, -40)]
    return swells(*np.transpose(GROANS)) * elevation(-1.0) * rush(lowest, patchy_db=1.0, grit_db=0.33)


def knock():
    out = np.zeros((2, N + SR))
    for s, db in KNOCK:
        add(out, s - .007, elevation(db - 19.5) * ring(BOARD, attack=0.0004, scatter_db=3.0, blur=40), 1.5)
        add(out, s, elevation(db - 12.5) * slap(top_hz=1630, t60=0.018), .8)
        add(out, s + 0.001, elevation(db + 2.5) * ring(BOARD, attack=0.0006, scatter_db=1.5, blur=2.5), 1.5)
        add(out, s + .004, elevation(db - 33.5) * ring(TABLE, attack=.008, scatter_db=2.5, blur=8), 0)
    return out[:, :N]


def gust():
    out = np.zeros((2, N + SR))
    for s, db in KNOCK:
        add(out, s, elevation(db - 5.5) * slap(top_hz=850, t60=.06), 0)
    return out[:, :N]


def room(x, wet_db):
    out, step = np.zeros((2, N + SR * 2)), SR // 3
    for at in range(0, N, step):
        hz, t, z = signal.stft(rng.standard_normal((2, SR * 2 // 3)), SR, nperseg=256)
        z[1] *= (0.56 * hz / (hz + 250) / (1 + (hz / 7500) ** 6))[:, None]
        decay = elevation(-60 * t / along(ROOM, hz)[:, None])
        mid, side = signal.istft(z * decay, SR, nperseg=256)[1]
        tail = (mid + side * np.array([[1], [-1]])) / np.linalg.norm(mid)
        wet = signal.fftconvolve(x[None, at:at + step], tail, axes=1)
        out[:, at + 350:at + 350 + wet.shape[1]] += wet
    return elevation(wet_db) * out[:, :N]


def scene():
    stick, creases, board = taps(), snaps(), knock()
    hits = elevation(-10) * stick + elevation(-8.5) * creases + elevation(-12) * coloured(board, ECHO) + gust()
    echoes = room(hits.mean(axis=0), wet_db=-4.0)
    return quiet() + paper() + stick + pops() + ticks() + creases + groan() + board + echoes


def low_pass(x):
    return signal.sosfilt(signal.butter(12, 16680, fs=SR, output="sos"), x)


def record(dry):
    half = np.array([[.5], [-.5]])

    def ports(hz):
        low_cut = hz ** 4 / (hz ** 4 + 33 ** 4)
        return elevation(half * along(PORT_TILT, hz)) * np.exp(1j * half * along(PORT_LAG, hz)) * low_cut

    x = filtered(dry, ports)
    mix = x / (1 + np.abs(x) ** 6) ** (1 / 6)
    return low_pass(mix)


dry = scene()
out = record(dry)
dump_mix(out)
```